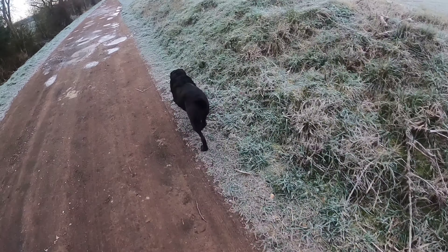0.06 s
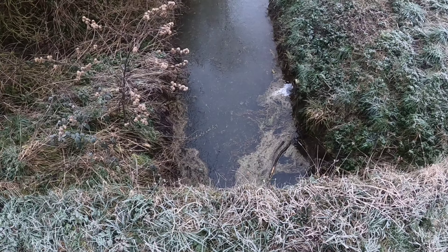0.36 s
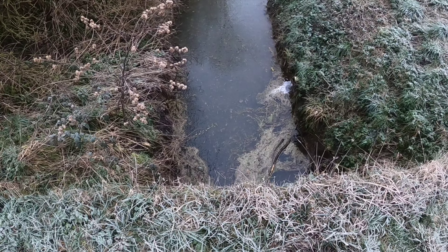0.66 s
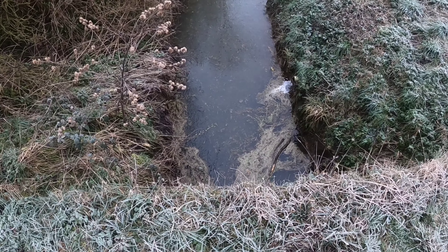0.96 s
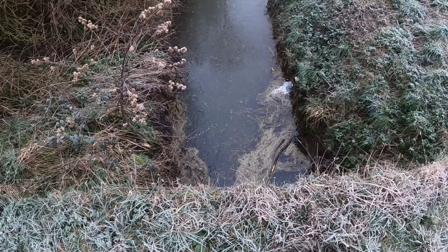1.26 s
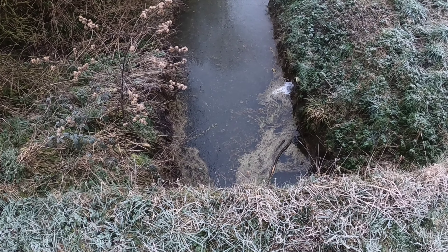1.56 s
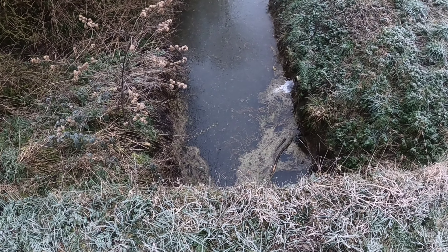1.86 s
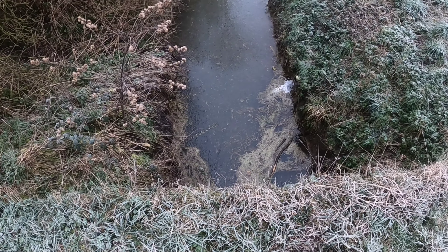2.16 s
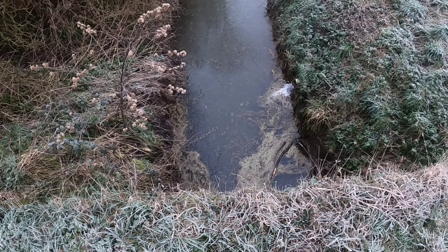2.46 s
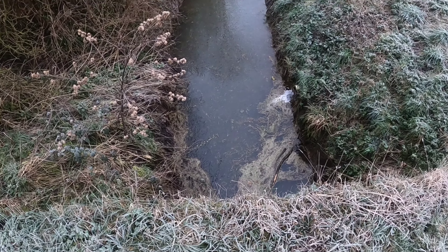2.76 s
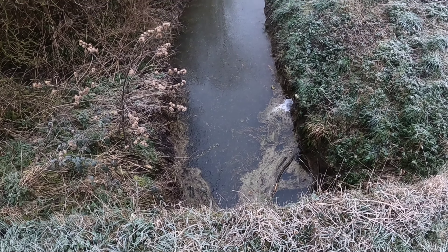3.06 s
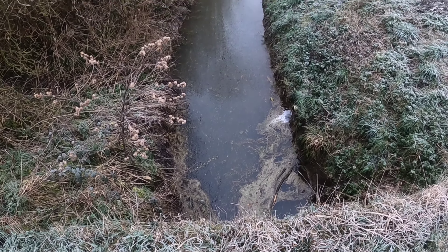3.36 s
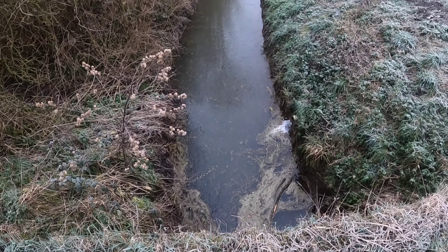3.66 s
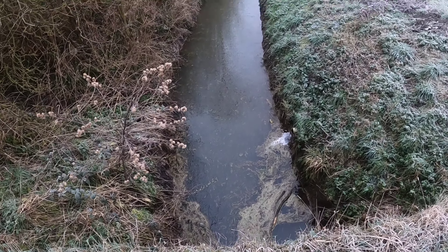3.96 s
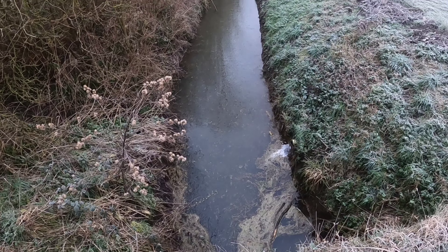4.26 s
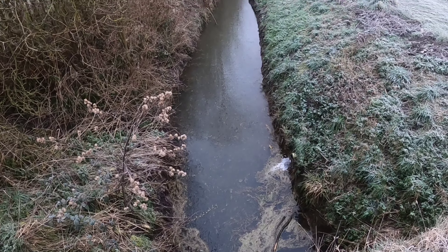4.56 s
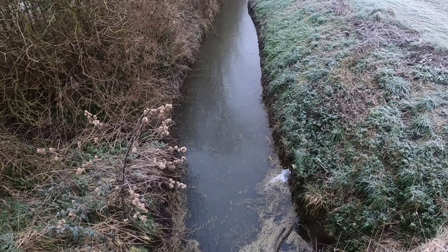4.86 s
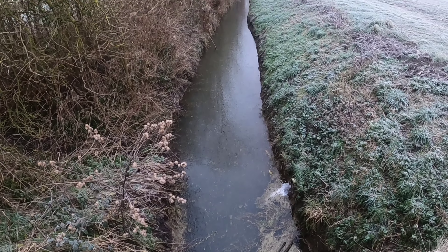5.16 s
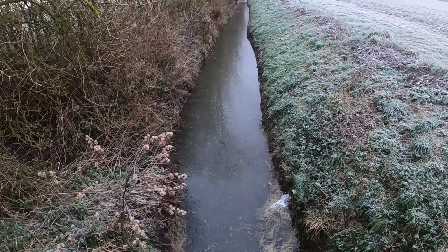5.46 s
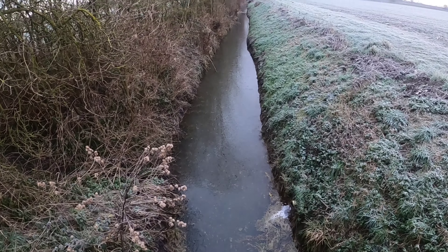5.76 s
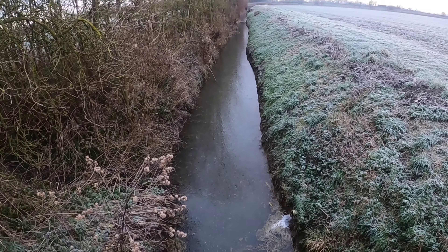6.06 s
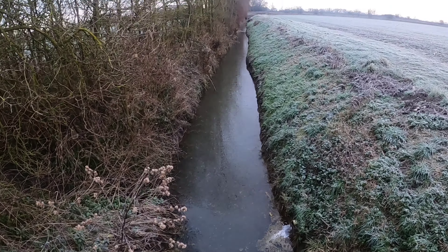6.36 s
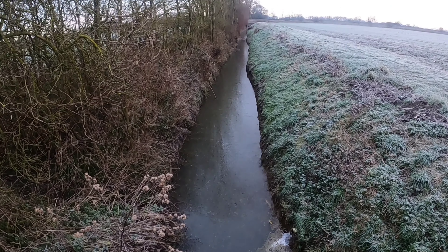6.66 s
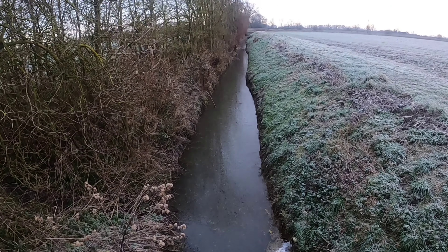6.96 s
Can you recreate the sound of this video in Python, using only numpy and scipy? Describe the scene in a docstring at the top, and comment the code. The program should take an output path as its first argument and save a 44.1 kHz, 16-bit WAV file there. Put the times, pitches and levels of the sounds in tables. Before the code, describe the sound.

A single boot step thuds and crunches on a gritty farm track, cutting off at about 0.15 seconds. After a brief silence, at 0.4 seconds, a small outfall fades in, pouring into a ditch. It bubbles and gurgles with a fine hiss of spray, small splashes and crisp plinking drops, strongest in the first second and then steady to the end at about 7 seconds. Underneath runs a low rumble with the hum of distant machinery, joined by a slightly higher drone near 4 seconds. The water starts in mono and widens from 3 seconds, the pour slightly left; after 4 seconds the gurgle recedes and little drips stand out more. Between 3 and 3.8 seconds a small bird on the left gives one high falling whistle, two lower level notes and a pip. Another calls very faintly near 0.8 seconds and three times from about 6 seconds.

```python
"""A small outfall pours into a drainage ditch: the jet drives bubbles under the water and throws up
froth, hissing spray and crisp droplets. Far machinery hums over a low rumble.
Ahead of it, one boot step on a gritty farm track breaks off, and the ditch fades in.
A small bird gives one high falling whistle and two lower level ones; another calls faintly from far off."""
import sys
import numpy as np
from scipy import signal
from scipy.fft import rfft, irfft
from scipy.io import wavfile
from scipy.ndimage import uniform_filter1d

SR = 44100
rng = np.random.default_rng(int(sys.argv[2]) if len(sys.argv) > 2 else 0)


def unload_audio(sound):
    """Save the sound as a 16-bit wav file, at the path given as the first command line argument."""
    columns = np.transpose(np.atleast_2d(sound))
    # keep every value between -1 and 1, then stretch to whole-number steps
    steps = np.round(np.clip(columns, -1, 1) * 32767)
    wavfile.write(sys.argv[1], SR, steps.astype(np.int16))


N = 317520
T = np.arange(N) / SR
BREAK_S, FADE_IN_S = 0.1536, (0.33, 0.41)  # the track cuts out; the ditch fades in


def amp(db):
    return 10 ** (np.asarray(db) / 20)


def unit(x):
    return x / np.sqrt(np.mean(x ** 2) + 1e-20)


def eq_gain(curve, hz):
    """Gain of an EQ curve at these frequencies."""
    points_hz, db = np.transpose(curve)
    return amp(np.interp(np.log(hz + 1), np.log(points_hz + 1), db))


def fader(curve):
    """Gain over time from breakpoints in seconds and dB."""
    return amp(np.interp(T, *np.transpose(curve)))


def add(mix, start, sound):
    part = mix[..., max(round(start * SR), 0):][..., :sound.shape[-1]]
    part += sound[..., :part.shape[-1]]


def colour(x, spectrum):
    """Shapes x with an EQ curve, at rms 1."""
    return unit(irfft(rfft(x) * eq_gain(spectrum, np.fft.rfftfreq(N, 1 / SR)), N))


def noise(spectrum):
    """Two independent channels of shaped noise."""
    return colour(rng.standard_normal((2, N)), spectrum)


def drift(rate_hz):
    """A smooth random wander, at rms 1."""
    lowpass = np.exp(-(np.fft.rfftfreq(N, 1 / SR) / rate_hz) ** 2)
    return unit(irfft(rfft(rng.standard_normal(N)) * lowpass, N))


def snap(hz, octaves, decay, scatter_db, scatter_s, crack, size=4096):
    """An impact 2 ms in: a burst in one band, an optional thin crack above it, then a faint scatter."""
    t, freqs = np.arange(size) / SR - .002, np.fft.rfftfreq(size, 1 / SR)
    age = np.maximum(t, 0)
    band = np.exp(-(np.log2((freqs + 1) / hz) / octaves) ** 2 / 4)
    white = rng.standard_normal((2, size)) * (t > 0)
    blow = rfft(white * np.exp(-age / decay)) * (band + crack * (freqs > hz))
    scatter = rfft(white * amp(scatter_db) * np.exp(-age / scatter_s)) * band
    edges = np.clip(1 + t / .002, 0, 1) * np.clip((t[-1] - t) / .04, 0, 1) ** 2
    burst = irfft(blow + scatter) * edges
    head_s = max(.002, decay)  # the attack is brought to rms 1
    return burst / np.sqrt(np.sum(burst[:, t < head_s] ** 2, axis=1, keepdims=True) / (head_s * SR))


def banks(x, t60):
    """Sparse reflections off the banks and the hedge, dying away over t60 seconds."""
    t = np.arange(SR // 2) / SR
    taps = rng.standard_normal((2, len(t))) * (rng.random(len(t)) < 2000 / SR)
    taps *= (t > .006) * amp(-60 * t / t60)
    return signal.fftconvolve(x, taps / np.linalg.norm(taps[0]), axes=1)[:, :N]


# Pan of the open image. Each row: frequency in Hz, left over right in dB.
PAN = [(130, 0), (290, 0.8), (630, 4.5), (1300, 5.5), (3000, 0), (6600, 1.5), (13000, -6)]
# Diffuse width of the open image. Each row: frequency in Hz, side over mid in dB.
DIFFUSE_WIDTH = [(40, -20.5), (130, -19.5), (290, -17), (630, -22.5), (1380, -11.5), (3000, -8.5),
                 (6600, -1.5), (9000, 0.5), (13000, -0.5)]
# The ditch starts in mono and opens as the microphone is raised from the water to the fields.
# Each row: time in seconds, side gain in dB.
IMAGE_OPENING = [(0, -2), (.2, 1), (.33, -57.5), (2.7, -48.5), (3.0, -15.5), (3.45, -8.5), (4.3, -2.5),
                 (7.2, 3.5)]
def stereo(pair, lag_s=1.6e-5):
    """Turns a centre and a diffuse channel into stereo: the pour lies left, the spray leads right."""
    centre, diffuse = pair
    hz = np.fft.rfftfreq(N, 1 / SR)
    ratio = eq_gain(PAN, hz)
    direction = (ratio - 1) / (ratio + 1) - 1j * np.sin(np.pi * hz * lag_s)
    side = irfft(rfft(centre) * direction + rfft(diffuse) * eq_gain(DIFFUSE_WIDTH, hz), N)
    side *= fader(IMAGE_OPENING)
    return centre + np.array([side, -side])


def running(start, end, fade_s=0.3):
    """Fades a machine sound in and out."""
    return np.clip(np.minimum(T - start, end - T) / fade_s, 0, 1)


# EQs of the low rumble, the higher drone and the faint whir. Each row: frequency in Hz, relative dB.
RUMBLE_EQ = [(10, -49), (22, -10.5), (35, 0), (60, 1), (78, 0), (120, -9.5), (170, -11), (220, -16.5),
             (270, -23.5), (380, -30), (800, -48), (2000, -84)]
DRONE_EQ = [(90, -13.5), (140, -1), (210, -7), (300, -37.5), (600, -72)]
WHIR_EQ = [(220, -38), (340, 0), (420, 1.5), (560, -5), (800, -60)]
# Engine tones. Each row: start and end in seconds, pitch in Hz, level in dB, throb depth from 0 to 1.
ENGINE_TONES = [(1.5, 7.2, 58.5, -53.5, 0), (0.41, 1.32, 106, -40.5, 0), (1, 3.93, 104, -47.5, 0),
                (0.28, 1.7, 294, -64.5, 0.1), (0.57, 4.19, 331, -63.5, 0.73), (3.66, 7.4, 328, -68.5, 0.25),
                (3.6, 7.03, 140, -52, 0), (3.46, 7.13, 199, -59.5, 0.08)]
def machinery(settle_s=0.8, sink_db_per_s=0.65, throb_hz=3.62, wander=0.0119, waver_db=1.3):
    """Far machines: a rumble that settles, a later drone and whir, and engine tones that come and go."""
    age = np.maximum(T - FADE_IN_S[1], 0)
    out = noise(RUMBLE_EQ) * amp(-38 + 5.5 * np.exp(-age / settle_s) - sink_db_per_s * age)
    out += amp(-50) * running(3.87, 7.34) * noise(DRONE_EQ)
    out += amp(-62) * running(6.55, 7.5) * noise(WHIR_EQ)
    throb = np.sin(2 * np.pi * throb_hz * T)
    for start, end, hz, db, depth in ENGINE_TONES:
        pitch = hz * (1 + wander * drift(4.95))
        tone = np.sqrt(2) * np.sin(2 * np.pi * np.cumsum(pitch) / SR)
        out[0] += amp(db) * running(start, end) * tone * (1 + depth * throb) * amp(waver_db * drift(12))
    return out


# The low ambience on the track. Each row: frequency in Hz, relative level in dB.
TRACK_EQ = [(20, -4.5), (70, 16), (150, -2), (400, -7), (900, -11.5), (2000, -25), (4500, -33.5),
            (8000, -40), (14000, -57)]
# Heel, then sole. Each row: start in seconds, level in dB, pitch in Hz, swell in seconds.
BOOT_THUDS = [(0.021, -34.5, 188, 0.003), (0.1043, -39, 264, 0.0019)]
# Crunch. Each row: start in seconds, level in dB, centre in Hz, width in octaves, decay in seconds.
GRIT_CRACKS = [(0.0107, -49, 1110, 0.43, 0.0011), (0.024, -46.5, 600, 0.5, 0.0046),
               (.062, -57, 4700, 0.31, 0.0011), (0.079, -60.5, 4180, 0.51, 0.0056),
               (0.0835, -47, 2300, 0.39, 0.00098), (0.1044, -39.5, 614, 0.46, 0.0044),
               (0.106, -47.5, 1740, 0.41, 0.0034)]
def footstep():
    """A boot thuds down and cracks the grit of the track, over a bed of low noise."""
    out = amp(-41.5) * noise(TRACK_EQ)
    t = T[:SR // 20]
    for start, db, hz, swell in BOOT_THUDS:
        envelope = t / swell * np.exp(1 - t / swell)
        add(out, start, amp(db) * np.sqrt(2) * envelope * np.sin(2 * np.pi * hz * t))
    for start, db, hz, octaves, decay in GRIT_CRACKS:
        grit = snap(hz, octaves, decay, scatter_db=-20, scatter_s=0.01, crack=0)
        add(out, start - .002, amp(db) * grit)
    return out


def whistle(length, db, first_hz, last_hz, scoop_hz=0, waver_hz=12, waver_per_s=180, tremble_db=1.5):
    """A nearly pure, slightly trembling glide that may scoop up into its pitch."""
    t = np.arange(round(length * SR)) / SR
    glide = first_hz + (last_hz - first_hz) * t / length
    hz = glide - scoop_hz * np.exp(-t / 0.0053) + waver_hz * drift(waver_per_s)[:len(t)]
    edges = np.clip(np.minimum(t, length - t) / 0.013, 0, 1) ** 0.32
    gain = amp(db + tremble_db * drift(110)[:len(t)])
    return np.sqrt(2) * edges * gain * np.sin(2 * np.pi * np.cumsum(hz) / SR)


# The near bird's two lower notes.
# Each row: start and length in seconds, relative level in dB, first and last pitch in Hz.
NEAR_NOTES = [(3.415, 0.083, -46.8, 4335, 4225), (3.687, 0.05, -47, 4265, 4205)]
def near_bird(fall_s=0.146, swell_s=0.02, fade_s=0.016):
    """A high falling whistle, two lower notes each led by a faint rising chirp, and a closing pip."""
    song = np.zeros(N)
    fall = whistle(fall_s, -47.8, 5530, 5070, waver_hz=24, tremble_db=3)
    age = T[:len(fall)]
    add(song, 3.033, fall * np.clip(np.minimum(age / swell_s, (fall_s - age) / fade_s), 0, 1))
    for start, *note in NEAR_NOTES:
        chirp = whistle(0.033, -66.5, 5600, 6300, scoop_hz=330, waver_hz=330, waver_per_s=760,
                        tremble_db=2)
        add(song, start - 0.019, chirp)
        add(song, start, whistle(*note, scoop_hz=330))
    pip = whistle(0.022, -44, 4185, 4150)
    add(song, 3.746, pip)
    return song


# Faint calls from far off. Each row: start in seconds, relative level in dB.
FAR_NOTES = [(0.775, -70.5), (5.88, -75.5), (6.36, -70.5), (6.9, -71.5)]
def far_bird():
    """A distant bird repeats one thin, sagging note."""
    song = np.zeros(N)
    for start, db in FAR_NOTES:
        add(song, start, whistle(0.16, db, 4715, 4605, waver_hz=28, waver_per_s=70, tremble_db=3))
    return song


def birds(lead_s=7e-5, echo_s=0.05):
    """Both birds whistle from the left, with one clear echo off the bank and a tail from the hedge."""
    song = near_bird() + far_bird()
    echo = amp(-10) * np.interp(T - echo_s, T, song)
    clear = amp(-4.5) * (song + echo)
    lead = lead_s * np.minimum(fader(IMAGE_OPENING), .55) / 2  # the left leads once the image opens
    hedge = amp(-16.5) * stereo(banks(np.array([song, song]), t60=0.64))
    return np.array([np.interp(T + lead, T, clear), np.interp(T - lead, T, clear)]) + hedge


def bubbles(per_s, low_hz, high_hz, cycles, rise, spread_db, sizes=36):
    """Two channels of random small dying rings; a bubble's pitch rises as it nears the surface."""
    pair, t = np.zeros((2, N)), np.arange(2048) / SR
    for channel in pair:
        for hz in np.geomspace(low_hz, high_hz, sizes):
            age = t * hz / cycles
            ring = np.sin(2 * np.pi * hz * t * (1 + rise * np.minimum(age, 5)))
            ring *= np.exp(-age) * (1 - np.exp(-2 * t * hz))
            onsets = np.flatnonzero(rng.random(N) < per_s / sizes / SR)
            hits = np.zeros(N)
            hits[onsets] = rng.choice([-1, 1], len(onsets))
            hits[onsets] *= amp(spread_db * np.minimum(rng.exponential(1, len(onsets)), 4.5))
            channel += signal.oaconvolve(hits, unit(ring))[:N]
    return np.array([unit(channel) for channel in pair])


def drop(hz, octaves, tick_s=0.00058, ring_s=0.0013, ring_cycles=10):
    """A drop hits the water: the narrower its band, the longer it rings and the more its bubble sings."""
    decay = tick_s + ring_s * np.exp(-octaves / 0.034)
    splat = snap(hz, octaves, decay, scatter_db=-14.5, scatter_s=0.015, crack=0.003)
    cycles = hz * np.maximum(T[:splat.shape[1]] - .002, 0)
    bubble = 2.2 * np.sin(2 * np.pi * cycles) * np.exp(-cycles / ring_cycles) * (1 - np.exp(-cycles / 2))
    bubble_share = np.exp(-(octaves / 0.15) ** 2)
    return np.sqrt(1 - bubble_share) * splat + np.sqrt(bubble_share) * bubble


def ticks(per_s=24, centre_hz=7800, spread_db=1.6):
    """The smallest flying drops land at random as faint, bright ticks."""
    out = np.zeros((2, N))
    for when, size, strength in rng.random((round(per_s * N / SR), 3)):
        db = -77.5 + spread_db * min(-np.log(1 - strength), 3)
        hz = centre_hz * 2 ** (.5 * (size - .5))
        add(out, when * N / SR, amp(db) * drop(hz, octaves=.3))
    return out


# Fader ride of the small drips. Each row: time in seconds, level in dB.
DRIP_RIDE = [(0.4, -81), (3.7, -82), (4.2, -76), (5.2, -79), (7.2, -77.5)]
def drips():
    """Small clear drips, which stand out more once the microphone is raised."""
    near = bubbles(75, 2300, 5300, cycles=9, rise=0.0012, spread_db=2.6)
    return (near + amp(-6.5) * banks(near, t60=0.061)) * fader(DRIP_RIDE)


# Splash cues. Each row: middle and length in seconds, relative level in dB, centre in Hz.
SHOWERS = [(0.481, 0.15, -65, 4470), (0.715, 0.21, -61.5, 5500), (1.203, 0.55, -68, 4400),
           (1.822, 0.37, -70, 5160), (1.972, 0.17, -65, 3600), (2.428, 0.18, -65, 4450),
           (2.599, 0.26, -68, 4430), (2.822, 0.38, -73.5, 6560), (4.276, 0.23, -71, 4620),
           (4.523, 0.24, -70, 4500), (4.8, 0.17, -82, 6760), (5.167, 0.04, -76, 6540),
           (5.417, 0.071, -62, 3120), (5.87, 0.08, -73, 6760), (6.132, 0.12, -64, 3580),
           (6.259, 0.16, -70, 3820), (6.436, 0.14, -69.5, 5600), (7.107, 0.24, -79, 6430)]
def splashes(count=60, step_octaves=0.28, spread_db=2.5):
    """The jet slaps the water and throws up a shower of drops, thickest in its middle."""
    out = np.zeros((2, N))
    for middle, length, db, hz in SHOWERS:
        shower = np.zeros((2, N))
        times = rng.triangular(-.5, 0, .5, count)
        pitch_steps = rng.uniform(-3.5, 2.4, count)
        for when, step, strength in zip(times, pitch_steps, rng.standard_normal(count)):
            sound = drop(hz * 2 ** (step_octaves * step), octaves=0.15)
            add(shower, middle + when * length, amp(spread_db * (strength - abs(step))) * sound)
        out += amp(db - 4.5) * np.sqrt(length * SR / N) * unit(shower)
    return out


# Spot drops: narrow ones plink, wide ones tick.
# Each row: start in seconds, level in dB, centre in Hz, width in octaves.
FAT_DROPS = [(0.449, -49, 5160, 0.097), (0.506, -51, 4380, .14), (0.52, -49, 3120, 0.17),
             (0.674, -57, 5400, 0.38), (0.763, -52, 3150, 0.13), (0.859, -48, 3980, 0.08),
             (0.8995, -52, 3370, 0.098), (0.918, -61, 8300, 0.079), (0.963, -55.5, 3700, 0.18),
             (1.165, -57, 4260, 0.16), (1.011, -71, 9000, 0.23), (1.131, -63, 7000, 0.29),
             (1.253, -66, 7500, .4), (1.36, -68, 9500, 0.38), (1.475, -69, 8700, .12),
             (1.715, -65, 8300, .2), (1.4617, -55, 3280, 0.13), (1.6215, -61.5, 7580, 0.11),
             (1.719, -51.5, 5000, 0.11), (1.757, -56.5, 4930, 0.13), (1.824, -60, 5600, 0.13),
             (1.874, -62, 4740, .14), (2.4687, -61, 5900, 0.35), (2.556, -48.5, 3480, 0.21),
             (2.5815, -57, 6500, 0.23), (2.591, -63, 6300, .25), (2.6646, -62, 6500, 0.33),
             (2.8357, -64, 7960, 0.13), (3.0323, -66, 7750, .15), (3.193, -64, 7900, .2),
             (3.325, -78, 9500, .25), (3.9914, -55.5, 3800, 0.14), (4.017, -55, 3800, .06),
             (4.127, -62, 4900, .1), (4.142, -50, 2680, 0.47), (4.1735, -64, 6500, 0.35),
             (4.2309, -57, 4840, 0.17), (4.257, -53, 4600, 0.54), (4.262, -53, 7600, .06),
             (4.322, -58, 6560, 0.15), (4.355, -57, 3920, .09), (4.401, -57, 4560, 0.18),
             (4.438, -68, 8500, .35), (4.471, -52.5, 5140, 0.19), (4.498, -60, 5060, 0.073),
             (4.585, -56, 3600, 0.26), (4.629, -61, 5060, 0.078), (4.6614, -66, 9000, .35),
             (4.714, -60.5, 3680, 0.24), (4.743, -63, 4540, .1), (4.756, -60, 6360, .2),
             (4.813, -62, 7800, .25), (5.037, -63, 3300, .2), (5.1625, -57, 7450, 0.1),
             (5.167, -57.5, 4080, 0.48), (5.218, -66, 7460, 0.31), (5.28, -61, 5130, 0.09),
             (5.349, -61, 4670, 0.13), (5.405, -52, 2300, .07), (5.411, -51, 3650, 0.1),
             (5.4705, -66, 8300, .3), (5.4771, -68, 9000, 0.28), (5.532, -67, 9500, .3),
             (5.545, -64, 8440, .3), (5.635, -59, 3030, .09), (5.716, -67, 7000, .45),
             (5.725, -57.5, 4700, 0.37), (5.8569, -56, 8000, 0.24), (5.871, -56, 2630, 0.19),
             (5.968, -54.5, 4200, 0.3), (6.1245, -54.5, 3480, 0.43), (6.146, -53, 3140, 0.11),
             (6.209, -58, 4350, .09), (6.268, -59, 3700, 0.13), (6.3, -63, 4150, .1),
             (6.3742, -55, 4000, 0.071), (6.4265, -62, 7490, 0.18), (6.4887, -59, 3850, 0.11),
             (6.588, -59, 2770, 0.096), (6.7768, -53, 5360, 0.11), (6.818, -58, 2500, .2),
             (6.846, -63, 3400, .2), (7.01, -60, 8900, 0.22), (7.03, -56, 3880, 0.086),
             (7.089, -56, 3740, 0.38), (7.174, -55, 5200, 0.39)]
def droplets():
    """Fat drops fall clear of the jet and strike the water one by one."""
    out = np.zeros((2, N))
    for start, db, hz, octaves in FAT_DROPS:
        add(out, start - .0025, amp(db) * drop(hz, octaves))
    return out


def patchy(x, depth_db, bands, frames):
    """Clusters of drops swell for a moment, each over its own stretch of the spectrum."""
    spectrogram = signal.stft(x, nperseg=256)[2]
    swells = rng.standard_normal(spectrogram.shape[1:])
    for _ in range(2):
        swells = uniform_filter1d(swells, size=bands, axis=0)
        swells = uniform_filter1d(swells, size=frames, axis=1)
    return unit(signal.istft(spectrogram * amp(depth_db * unit(swells)))[1][:, :N])


# Strength of the pour. Each row: time in seconds, relative level in dB.
FLOW_RIDE = [(0.45, -42), (0.6, -41.5), (0.95, -45.5), (1.35, -45.5), (1.85, -50), (2.2, -50), (2.6, -46),
             (2.92, -48), (3.17, -49.5), (3.45, -48), (3.58, -49), (3.7, -47.5), (4.0, -49.5), (4.28, -48),
             (4.6, -49), (4.85, -47.5), (5.6, -49), (6.1, -48), (6.26, -48.5), (6.47, -48.5), (6.63, -48),
             (7.0, -48.5), (7.2, -47.8)]
def with_flow(db, follow, usual_flow_db=-48):
    """Gain of a layer that sits at db in the usual flow and moves by follow dB for each dB of flow."""
    return amp(db) * (fader(FLOW_RIDE) / amp(usual_flow_db)) ** follow


# The fizz of the spray. Each row: frequency in Hz, relative level in dB.
SPRAY_EQ = [(900, 13), (2200, 0.5), (3200, 6), (4800, 5), (6000, 0.5), (7000, 1.8), (8200, 2.5),
            (10000, -7.5), (12500, -15.5), (15000, -45)]
def spray():
    """Fine drops patter in clumps and larger ones plink, over a softly fluttering hiss."""
    clumps = amp(3 * drift(14))
    clumps /= clumps.mean()
    fine = bubbles(900 * clumps, 3500, 13000, cycles=2.2, rise=0, spread_db=3.6)
    plinks = bubbles(450 * clumps, 2300, 5300, cycles=6.5, rise=0.0012, spread_db=3.2)
    near = amp(2.5) * colour(fine, SPRAY_EQ) + amp(0.5) * plinks
    hiss = patchy(noise(SPRAY_EQ), depth_db=3, bands=9, frames=4)
    patter = near + amp(-7) * banks(near, t60=0.077)
    return patter * with_flow(-81, follow=1) + hiss * with_flow(-71, follow=1.22)


# The body of the pour. Each row: frequency in Hz, relative level in dB.
POUR_EQ = [(250, -15), (450, -13.5), (600, -2.5), (720, 0.5), (950, -1.5), (1300, -8), (1800, -18),
           (2600, -28.5), (4500, -33), (9000, -85)]
# Fader ride of the hollow gurgle under the jet. Each row: time in seconds, level in dB.
GURGLE_RIDE = [(0.5, -52.5), (1.2, -53), (2.1, -59), (2.85, -53), (3.45, -53), (4.3, -56.5), (4.7, -67.5),
               (7.2, -59.5)]
def outfall():
    """The jet drives a cloud of bubbles into the ditch; big ones gurgle in its hollow, small ones fizz."""
    cloud = bubbles(3500, 377.9, 2580, cycles=3.66, rise=0.012, spread_db=0.5)
    body = colour(cloud + amp(4) * rng.standard_normal((2, N)), POUR_EQ)
    gurgle = bubbles(160, 663, 846, cycles=12.4, rise=0.0039, spread_db=0.2, sizes=12)
    froth = noise([(600, -34), (1250, 7), (1700, -2.5), (2500, -8.5), (5000, -45)])
    return (body * with_flow(-48.5, follow=0.98)
            + gurgle * fader(GURGLE_RIDE) * amp(1.2 * drift(4.5))
            + patchy(froth, depth_db=3, bands=4, frames=7) * with_flow(-63.5, follow=1.16))


def scene():
    """The step on the track, a moment of silence, then the ditch."""
    on_track = np.clip((BREAK_S - T) / 0.006, 0, 1)
    at_ditch = np.clip((T - FADE_IN_S[0]) / (FADE_IN_S[1] - FADE_IN_S[0]), 0, 1) ** 2.65
    ditch = outfall() + spray() + ticks() + drips() + splashes() + droplets() + machinery()
    return stereo(on_track * footstep() + at_ditch * ditch) + birds()


def record(dry, cutoff_hz=14900):
    """A steep low-pass trims the highest treble."""
    lowpass = signal.firwin(511, cutoff_hz, window=("kaiser", 9), fs=SR)
    return signal.oaconvolve(dry, lowpass[None], "same")


dry = scene()
out = record(dry)
unload_audio(out)
```